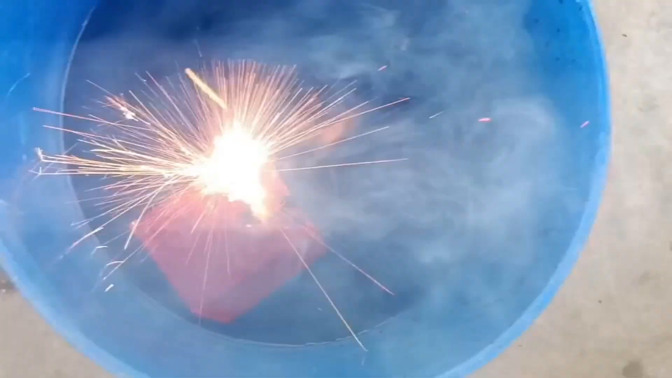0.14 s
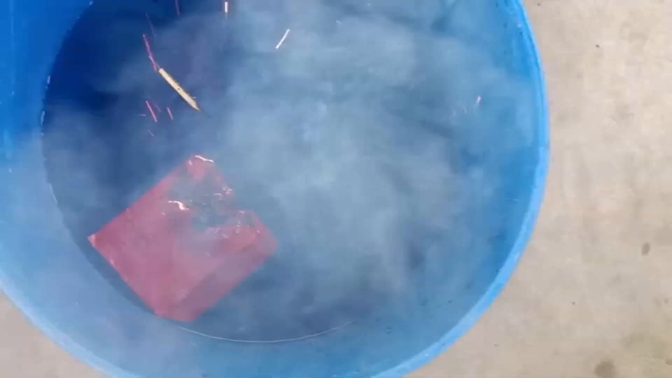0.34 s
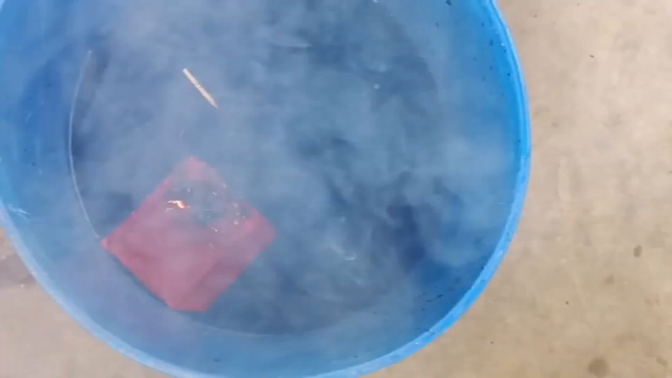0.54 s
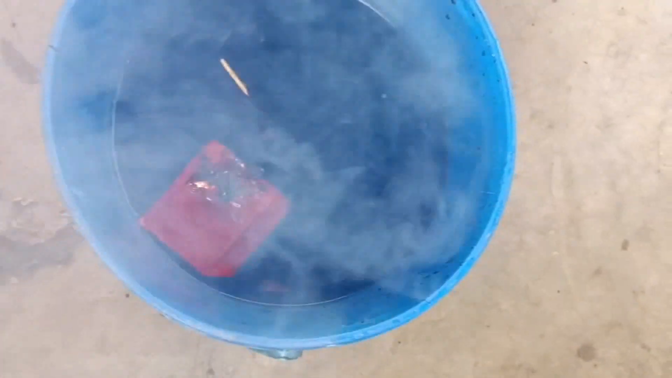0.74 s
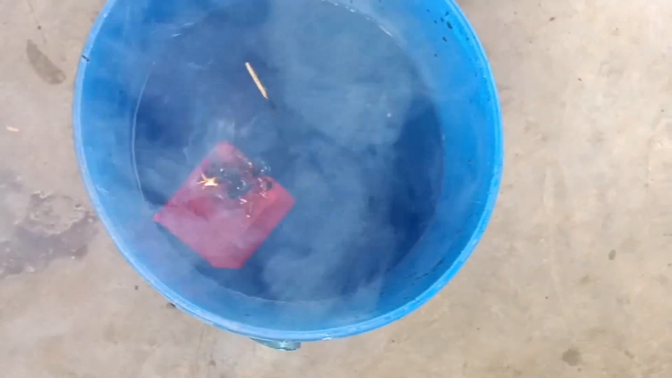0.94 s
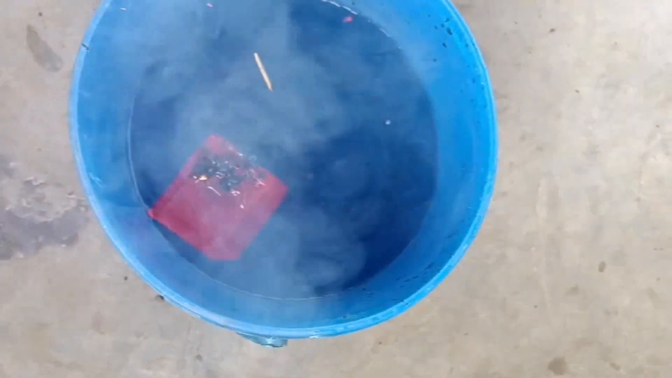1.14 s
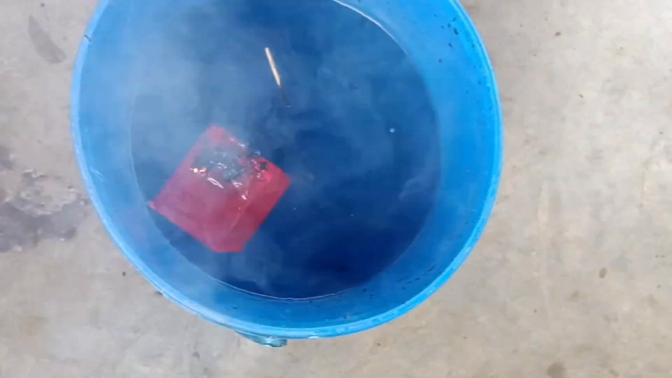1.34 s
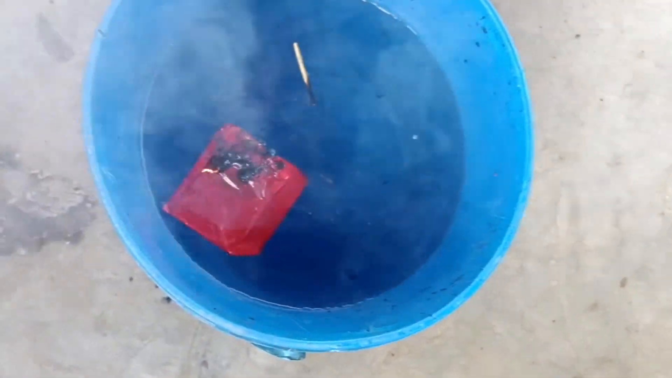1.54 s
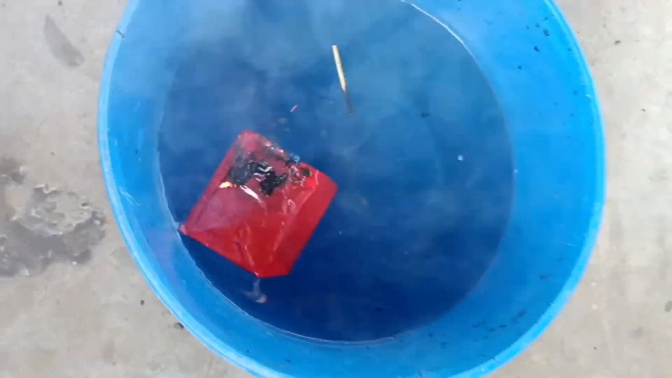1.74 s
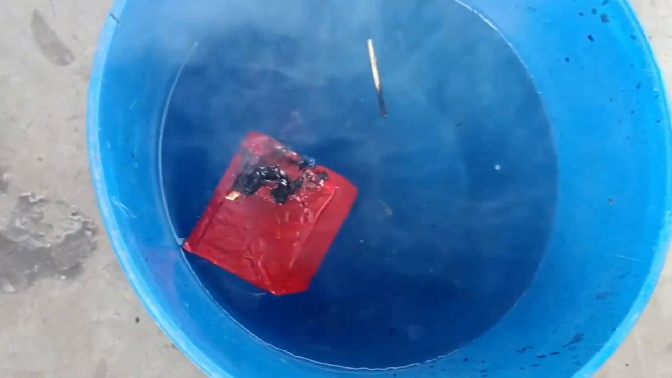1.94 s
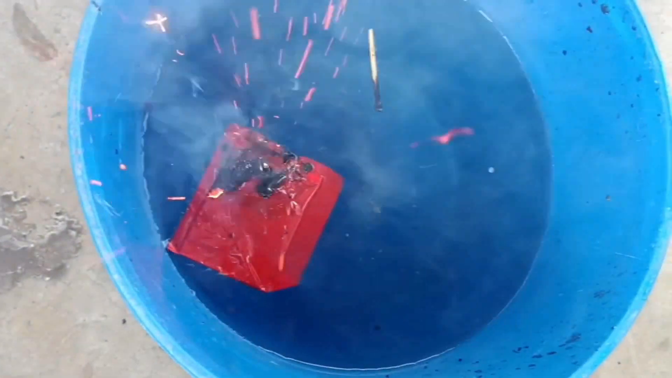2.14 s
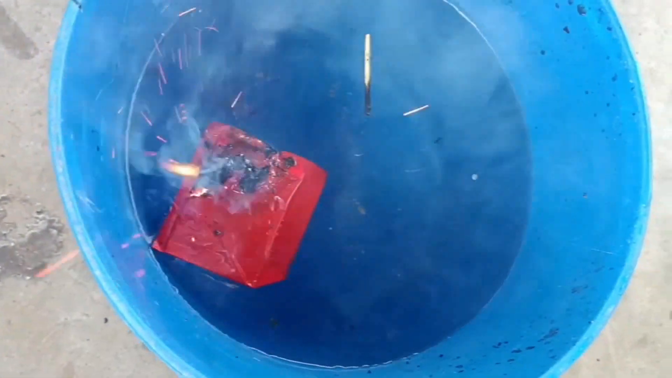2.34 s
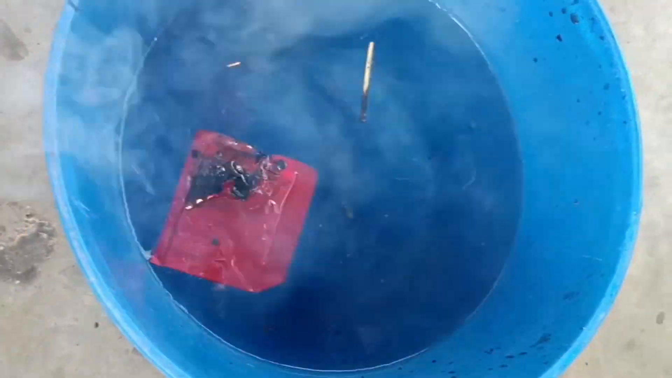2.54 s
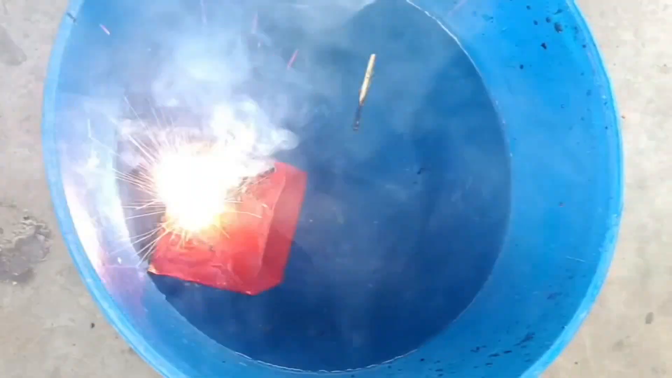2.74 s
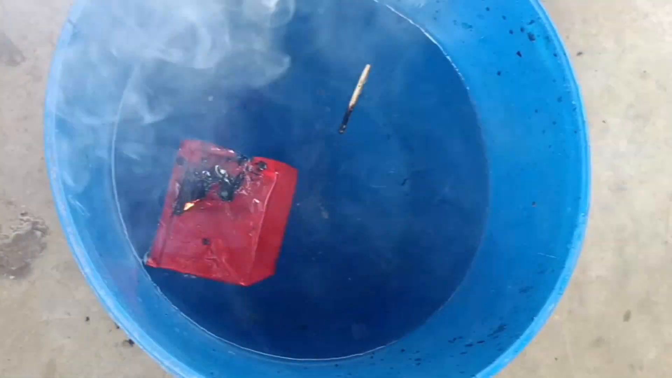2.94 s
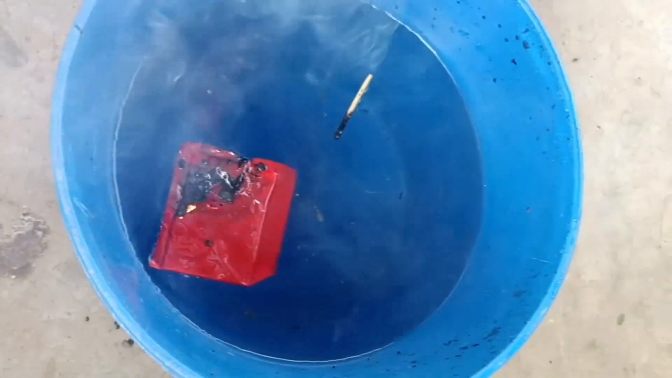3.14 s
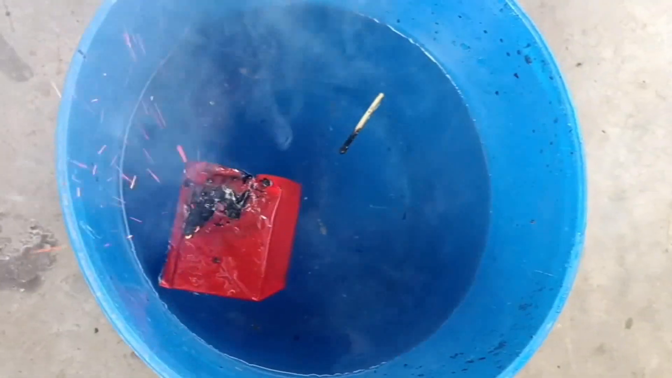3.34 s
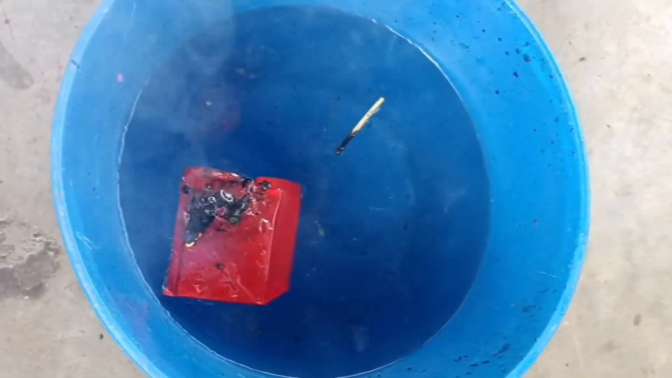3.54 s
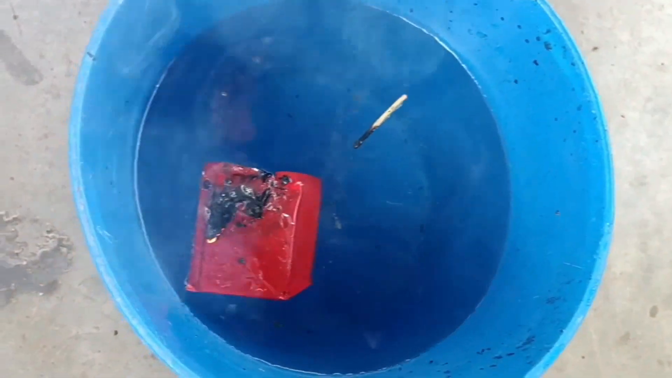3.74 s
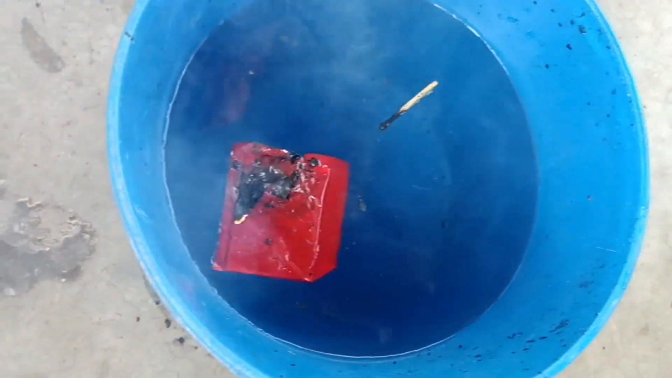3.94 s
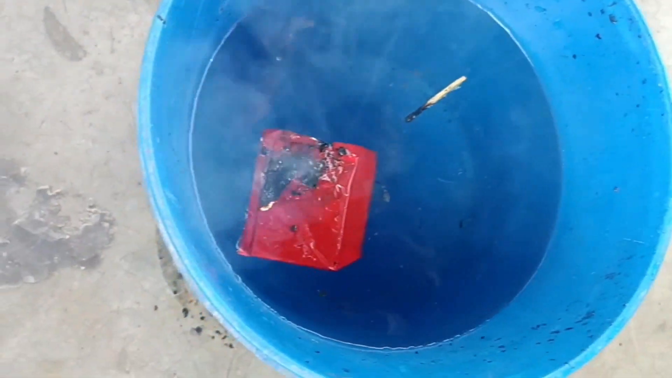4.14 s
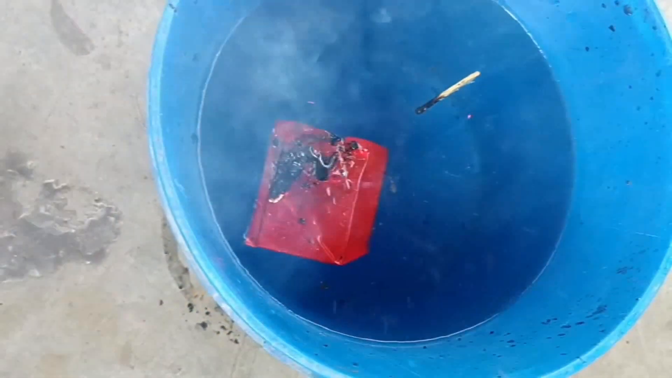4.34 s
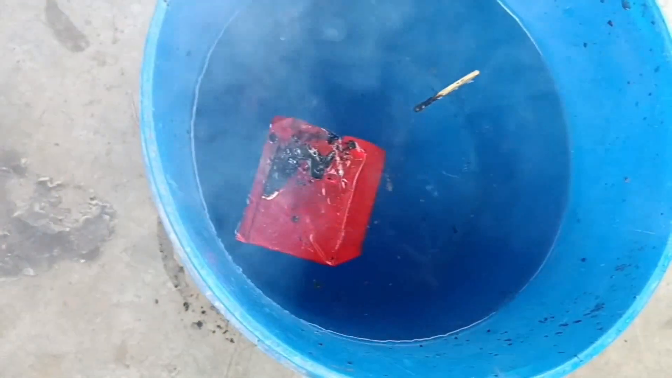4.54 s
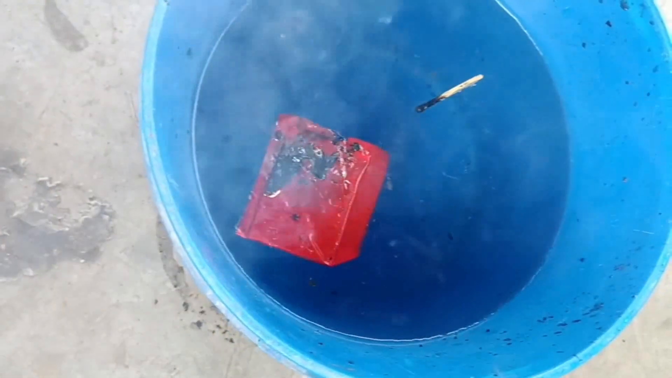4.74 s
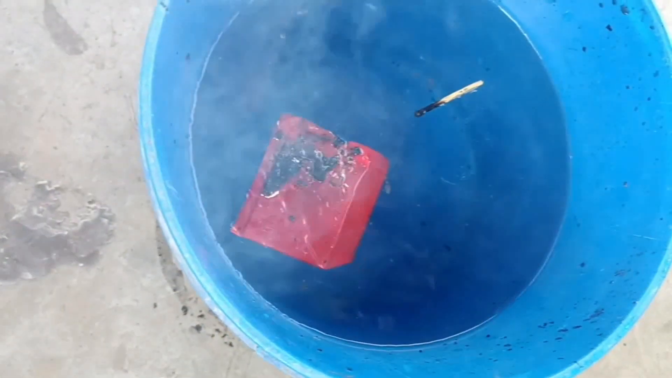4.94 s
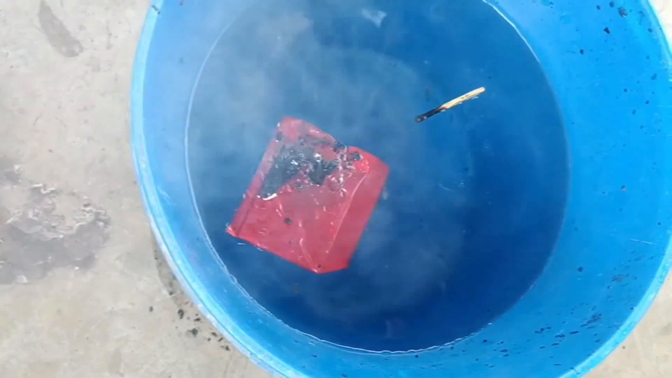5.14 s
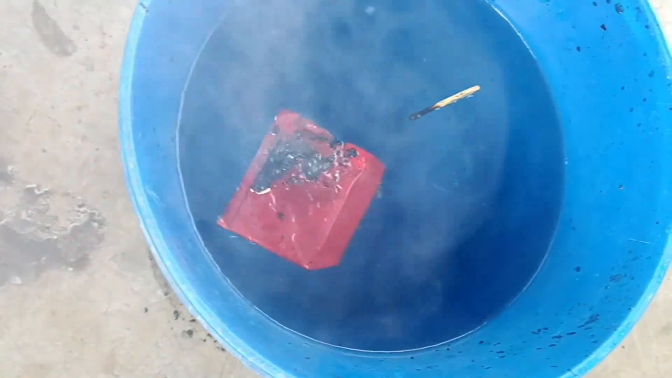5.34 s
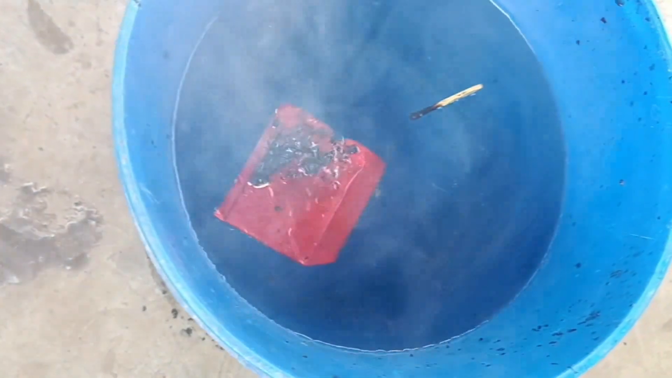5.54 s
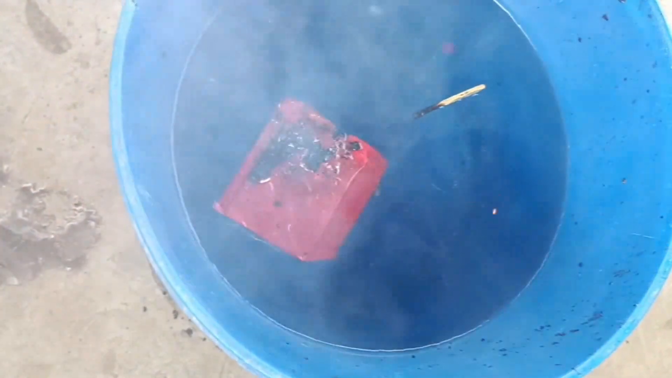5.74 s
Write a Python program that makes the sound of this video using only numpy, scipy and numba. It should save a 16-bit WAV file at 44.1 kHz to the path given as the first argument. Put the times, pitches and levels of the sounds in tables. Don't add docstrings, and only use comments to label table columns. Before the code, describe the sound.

Outdoors, close above a plastic bucket, small firecrackers burst in a floating box. A dense volley of sharp cracks, bucket thumps and burning spray fills the first second, then fizzing. A second tight cluster follows, then two late bangs with sparse ticks, water slosh and a hollow breathy tone. Far traffic rumbles low. The phone microphone clips and dips around each bang.

```python
import sys
import numpy as np
from scipy import signal
from scipy.fft import rfft, irfft
from scipy.io import wavfile
from scipy.ndimage import uniform_filter1d, minimum_filter1d
from numba import njit

SR = 44100
rng = np.random.default_rng(int(sys.argv[2]) if len(sys.argv) > 2 else 0)


def how_loud(loudness_db):
    steps = np.asarray(loudness_db, float) / 20
    return 10 ** steps


def log_audio(samples):
    frames = np.atleast_2d(samples).T
    limited = np.clip(frames, -1, 1)
    pcm = np.round(limited * 32767).astype(np.int16)
    wavfile.write(sys.argv[1], SR, pcm)


N = 255780

# (time [s], peak [dB], thump [dB], knock [Hz], spray [dB])
BANGS = [(0.108, 4, -23.5, 2400, -6), (0.186, -15.5, -14, 1780, 4), (0.196, -8.5, -13, 700, -2.5),
         (0.31, 3.5, -29.5, 3280, -16.5), (0.474, -0.5, -19.5, 2150, 1.5), (0.55, -5, -17.5, 3570, -1),
         (0.704, 0, -26, 760, -0.5), (0.973, -9, -13, 2230, 0), (1.148, -0.5, -66, 495, -7),
         (2.253, -2, -19.5, 856, -3), (2.559, 2.5, -29, 2080, -9.5), (2.607, -5, -13.5, 816, -6.5),
         (2.798, 1, -14, 572, -13.5), (2.845, -1, -18.5, 606, -6), (3.482, 0.5, -30.5, 720, -8.5),
         (4.408, -1.5, -17, 3330, -6)]
# (time [s], peak [dB], treble [dB], knock [Hz], spray [dB])
SNAPS = [(0.034, -11.5, -22, 795, -34), (0.041, -11.5, -17, 600, -10), (0.056, -11, -4.5, 820, -9),
         (0.289, -5, -21, 720, -10), (0.401, -10.5, -11.5, 710, -4), (0.604, -12, -8.5, 1570, -11.5),
         (1, -13.5, -18, 740, -2), (1.06, -13.5, -9, 580, -5), (1.848, -11.5, -3.5, 2480, -10.5),
         (2.165, -14, -8.5, 1390, -11), (2.178, -11, -15.5, 693, -9), (2.467, -8, -8, 2430, -18),
         (2.485, -9, -10.5, 1380, -12), (2.516, -12.5, -8.5, 1400, -6), (2.534, -12.5, -13, 1370, -1.5),
         (2.545, -10, -11, 2460, -3.5), (2.657, -13.5, 1, 2750, -20), (2.675, -17.5, -7, 3130, -0.5),
         (2.686, -11, -9, 3220, -7.5), (2.711, -12.5, -20, 587, -8.5), (2.734, -10.5, -10.5, 2120, -6.5),
         (2.774, -7, -16, 2140, -4), (2.915, -9.5, -21, 780, -24), (3.596, -12.5, -15, 2600, -5.5)]
# (time [s], peak [dB], knock [Hz])
MORE_SNAPS = [
    (0.029, -17, 746),
    (1.355, -25.5, 2750),
    (2.628, -15, 483),
    (2.944, -13.5, 2610),
    (2.991, -33, 2080),
    (3.042, -32, 1350),
    (4.466, -16, 2500),
    (4.564, -34, 2420),
    (4.868, -30.5, 1050),
]
# (frequency [Hz], level [dB per Hz])
POP_COLOUR = [(180, 1), (300, 0), (447, -2), (994, -7.5), (1140, -8), (1320, -7), (2070, -6.5), (3080, -6),
              (3400, -9.5), (3760, -12), (5250, -13.5), (7950, -1.5), (9880, -11), (14200, -17.5),
              (16000, -23.5)]
# (delay [s], level [dB])
WALL_ECHO = [
    (.0026, 0),
    (.0051, -35),
    (.0083, -21),
]
# (frequency [Hz], level [dB], time to fade by 60 dB [s])
BUCKET = [
    (131, 16, 0.027),
    (201, 13, 0.038),
    (306, -19.5, 0.0065),
]
# (frequency [Hz], width [Hz], level [dB])
AIR = [(940, 17, -42), (1770, 15, -73), (2097, 24, 3.5), (2597, 27, 1.5), (3150, 22, -81), (3368, 14, 1.5),
       (4180, 14.6, 4), (5660, 27, -2), (6300, 25, -4), (6900, 23, -12), (7370, 20, 5), (7950, 80, -18),
       (8480, 39, 1.5), (8940, 190, -7.5)]
# (frequency [Hz], level [dB per Hz])
FIZZ_COLOUR = [(82, -39), (140, -3), (221, -3.5), (249, -1.5), (328, -12), (632, -6.5), (670, -9.5),
               (801, -10), (2250, -9.5), (2430, -5.5), (4320, -16), (6560, -11), (8480, -4.5),
               (9940, -16.5), (16000, -25.5)]
# (time [s], level [dB])
BURN = [(0.0, -28), (0.3, -54), (0.66, -30), (0.79, -20.5), (0.95, -28), (1.099, -33), (1.4, -35.5),
        (1.7, -39.5), (1.95, -39.5), (2.3, -34.5), (2.6, -37), (2.91, -35.5), (3.44, -36), (3.68, -36.5),
        (4.25, -37.5), (4.6, -40), (4.93, -38), (5.8, -40.5)]
# (time [s], level [dB], rise [s], fall [dB per s])
SLOSHES = [
    (0.05, -51, 0.045, 60),
    (1.08, -33.5, 0.17, 44),
    (2.9, -29.5, .05, 122),
    (3.64, -30, 0.086, 37),
]
# (time [s], level [dB], rise [s], fall [dB per s])
HOLLOWS = [
    (1.4, -41, 0.13, 48),
    (2.3, -43, .1, 30),
    (3.03, -32, 0.24, 23),
]
# (time [s], level [dB], rise [s], fall [dB per s])
PUFFS = [
    (4.94, -44.5, 0.046, 300),
]
# (time [s], level [dB], rise [s], fall [dB per s])
JETS = [
    (0.8, -37, .1, 42),
    (2.2, -53, .1, 54),
]
# (frequency [Hz], level [dB per Hz])
TRAFFIC = [(15, -55), (25, -26), (45, -10.5), (70, -7), (92, 1), (110, -0.5), (129, -14), (170, -23.5),
           (220, -42), (370, -120)]
# (frequency [Hz], chance [0-1])
WIDE_QUIET = [(300, 0), (3700, .01), (4100, .5), (5600, .5), (6400, .04), (16000, .03)]
# (frequency [Hz], chance [0-1])
WIDE_LOUD = [(300, .01), (4000, .02), (6000, .15), (8500, .45), (16000, .45)]

LEAD_S = 0.008
BANG_TREBLE_DB, DULL_PER_DB, DULL_PER_OCTAVE_DB = -18, 0.56, 2
SNAP_THUMP_DB = -59
MORE_THUMP_DB, MORE_TREBLE_DB, MORE_SPRAY_DB = -38, -6, -10.5
HOLD_S, HOLD_FROM_DB = 0.016, -4.5
SPRAY_T60_S, SMALL_T60_S = 0.093, 0.099
FLARE_S, FLARE_RISE_S = 0.0028, 0.0009
CRISP_DB, SMALL_ECHO_DB = 3.5, -7
CRACK_DB, CRACK_S = -3.5, 0.00054
CALM_DB, HISS_DB, HISS_FOLLOWS = -37.5, -38, 0.61
DUCK_FROM_DB, DUCK_SHARE = -18, 0.39
AHEAD_S, RECOVER_S = 0.024, 0.086


def charges():
    rows = []
    for s, db, thump_db, hz, spray_db in BANGS:
        treble_db = BANG_TREBLE_DB - DULL_PER_DB * db - DULL_PER_OCTAVE_DB * np.log2(hz / 1000)
        rows.append((s, db, thump_db, treble_db, hz, spray_db))
    for s, db, treble_db, hz, spray_db in SNAPS:
        rows.append((s, db, SNAP_THUMP_DB, treble_db, hz, spray_db))
    for s, db, hz in MORE_SNAPS:
        rows.append((s, db, MORE_THUMP_DB, MORE_TREBLE_DB, hz, MORE_SPRAY_DB))
    return rows


def burning_spray(after, t, strong, grain):
    flare = np.exp(np.minimum(t - 0.001, 0) / FLARE_RISE_S) * (t > -FLARE_S)
    sparks = how_loud(2.5 * uniform_filter1d(grain, size=40) * np.sqrt(40))
    t60 = SMALL_T60_S + strong * (SPRAY_T60_S - SMALL_T60_S)
    blaze = np.exp(-np.log(1000) * np.maximum(after - strong * HOLD_S, 0) / t60) * sparks
    yard = how_loud(-21.5) * np.exp(-np.log(1000) * after / 0.44)
    return flare * (blaze + yard)


def bucket_thump(after, scatter):
    sag = after + 0.67 * 0.003 * (1 - np.exp(-after / 0.0019))
    ring = 0
    for k, (hz, db, t60) in enumerate(BUCKET):
        note_hz = hz * (1 + 0.05 * np.tanh(scatter[k]))
        ring = ring + how_loud(db) * np.sin(2 * np.pi * note_hz * sag) * np.exp(-np.log(1000) * after / t60)
    return ring


def pops():
    t = np.arange(int(SR / 2)) / SR - LEAD_S
    after = np.maximum(t, 0)
    body, treble, rings = np.zeros((3, N + len(t)))
    for s, peak_db, thump_db, treble_db, knock_hz, spray_db in charges():
        noise = rng.standard_normal((4, len(t)))
        size = how_loud(peak_db + max(peak_db - DUCK_FROM_DB, 0) * 0.85)
        strong = np.clip((peak_db - HOLD_FROM_DB) / 6, 0, 1)
        weak = 1 - strong

        snap = how_loud(CRISP_DB * weak) * np.sign(np.sin(np.pi * after / 0.00012)) * (after < 0.00024)
        knock = np.sin(2 * np.pi * knock_hz * after) * np.exp(-after * knock_hz / 1.92)
        knock = how_loud(CRISP_DB * weak) * knock
        echoes = sum(how_loud(db) * (t > lag) * np.exp((lag - after) / 0.0011) for lag, db in WALL_ECHO)
        echoes = echoes * how_loud(SMALL_ECHO_DB * weak)
        crack = how_loud(CRACK_DB) * weak * np.sin(2 * np.pi * after / CRACK_S) * (after < CRACK_S)
        spray = how_loud(spray_db) * burning_spray(after, t, strong, noise[2])
        thump = how_loud(thump_db) * bucket_thump(after, noise[3])

        start = int((s - LEAD_S) * SR)
        at = slice(start, start + len(t))
        body[at] += size * (how_loud(-9) * snap + (how_loud(9) * echoes + spray) * noise[0])
        treble[at] += size * how_loud(treble_db + 8.5) * (how_loud(5.5) * snap + (echoes + spray) * noise[1])
        rings[at] += size * (thump + knock + crack)

    burning = colour(body[:N], POP_COLOUR)
    low = band(burning, 413, 4190)
    high = band(colour(treble[:N], POP_COLOUR), 8350, 16500)
    roar = how_loud(-11.5) * band(burning, 56, 390)
    return how_loud(-0.5) * patchy(cavity(low + high), depth_db=2, columns=1) + rings[:N] + roar


def fizz():
    fizz_db = np.interp(np.arange(N) / SR, *np.transpose(BURN))
    hiss_db = HISS_DB + HISS_FOLLOWS * (fizz_db - CALM_DB)
    slosh_db, hollow_db = swells(-50, SLOSHES), swells(-53, HOLLOWS)

    spits = how_loud(0.73 * rng.exponential(size=N // 40 + 1).repeat(40)[:N])
    air = cavity(colour(rng.standard_normal(N) * spits, FIZZ_COLOUR), share_db=-4.5)
    air = patchy(air, depth_db=2)
    swell = walk(11)
    out = level(band(air, 383, 5380), 0) * how_loud(fizz_db + swell + walk(25))
    out += level(band(air, 4290, 21600), 0) * how_loud(hiss_db + swell + walk(27))

    water = band(colour(rng.standard_normal(N), FIZZ_COLOUR), 162, 433)
    water += how_loud(5.5) * band(rng.standard_normal(N), 683, 785)
    out += level(water, 0) * how_loud(slosh_db + 0.61 * walk(22))

    out += level(band(rng.standard_normal(N), 4900, 6300), 0) * how_loud(swells(-90, PUFFS))
    out += level(band(air, 1960, 3220), 0) * how_loud(swells(-82, JETS))

    breath = patchy(rng.standard_normal(N), depth_db=2.5)
    hollow = band(breath, 1306, 1486) + how_loud(-8) * band(breath, 1750, 2250)
    sing_db = hollow_db + 1.8 * np.minimum(hollow_db - fizz_db + 37, 0)
    return out + level(hollow, -0.41) * how_loud(sing_db)


def traffic():
    return level(colour(rng.standard_normal(N), TRAFFIC), -45.5) * how_loud(1.8 * walk(5))


def cavity(x, share_db=-7):
    out = x.copy()
    for hz, width, db in AIR:
        peak = signal.iirpeak(hz, hz / np.clip(width, 30, 300), fs=SR)
        out += how_loud(db + share_db + 6) * signal.lfilter(*peak, x)
    return out


def patchy(x, depth_db, rows=6, columns=3):
    spec = signal.stft(x, nperseg=1024)[2]
    field = uniform_filter1d(rng.standard_normal(spec.shape), rows, axis=0)
    field = uniform_filter1d(field, columns, axis=1)
    return signal.istft(spec * how_loud(depth_db * field / field.std()), nperseg=1024)[1][:N]


def swells(rest_db, rows):
    t, power = np.arange(N) / SR, how_loud(rest_db) ** 2
    for s, db, rise, fall in rows:
        swell_db = db - 20 * np.maximum(s - t, 0) / rise - fall * np.maximum(t - s, 0)
        power = power + how_loud(swell_db) ** 2
    return 10 * np.log10(power)


def walk(rate):
    k = int(SR / rate)
    steps = np.repeat(rng.standard_normal(N // k + 1), k)
    return 1.1 * uniform_filter1d(uniform_filter1d(steps, k), k)[:N]


def shape(table, size):
    hz, db = np.transpose(table)
    bins_hz = np.arange(size // 2 + 1) * SR / size
    return how_loud(np.interp(np.log(bins_hz + 1), np.log(hz), db))


def colour(x, table):
    c = irfft(np.log(shape(table, size=4096)))
    c[1:2048] *= 2
    c[2049:] = 0
    h = irfft(np.exp(rfft(c)))
    return signal.fftconvolve(x, h / np.sqrt(np.sum(h ** 2)))[:len(x)]


def band(x, lo_hz, hi_hz, order=2):
    return signal.sosfilt(signal.butter(order, [lo_hz, hi_hz], "band", fs=SR, output="sos"), x)


def level(x, db):
    return x * how_loud(db) / np.sqrt(np.mean(x ** 2))


def scene():
    return np.tile(pops() + fizz() + traffic(), (2, 1))


def sideways(mid):
    spec = signal.stft(mid, nperseg=1024)[2]
    hz = np.arange(0, len(spec), 16) * SR / 1024
    loud = uniform_filter1d(np.sum(abs(spec) ** 2, axis=0), size=2)[::2] > how_loud(-52)
    chance_loud = np.interp(hz, *np.transpose(WIDE_LOUD))[:, None]
    chance_quiet = np.interp(hz, *np.transpose(WIDE_QUIET))[:, None]
    chance = np.where(loud, chance_loud, chance_quiet)
    mask = np.kron(rng.random(chance.shape) < chance, np.ones((16, 2)))
    mask = mask[:spec.shape[0], :spec.shape[1]]
    turn = np.exp(2j * np.pi * rng.random(spec.shape))
    return how_loud(-1) * signal.istft(spec * mask * turn, nperseg=1024)[1][:N]


@njit
def recover(gain_db, step):
    out, g = np.empty(len(gain_db)), 0.
    for i in range(len(gain_db)):
        g = min(gain_db[i], g * step)
        out[i] = g
    return out


def duck(mid):
    ahead = int(AHEAD_S * SR)
    loud_db = 10 * np.log10(uniform_filter1d(mid ** 2, size=16) * 2 + 1e-12)
    want_db = -DUCK_SHARE * np.maximum(loud_db - DUCK_FROM_DB, 0)
    want_db = minimum_filter1d(want_db, ahead, origin=-(ahead // 2))
    gain_db = recover(want_db, np.exp(-1 / (RECOVER_S * SR)))
    return mid * how_loud(uniform_filter1d(gain_db, int(0.012 * SR)))


def low_pass(x):
    return signal.sosfilt(signal.butter(12, 16370, fs=SR, output="sos"), x)


def record(dry):
    mid = np.clip(duck(dry[0]), -0.9, 0.9)
    mid = signal.sosfilt(signal.butter(2, 55, "high", fs=SR, output="sos"), mid)
    mid = signal.sosfilt(signal.ellip(8, 0.2, 70, 16000, fs=SR, output="sos"), mid)
    time_left = np.arange(N)[::-1] / SR
    mid = mid * np.clip(time_left / 0.035, 0.1, 1)
    side = sideways(mid)
    return low_pass(np.array([mid + side, mid - side]))


dry = scene()
out = record(dry)
log_audio(out)
```